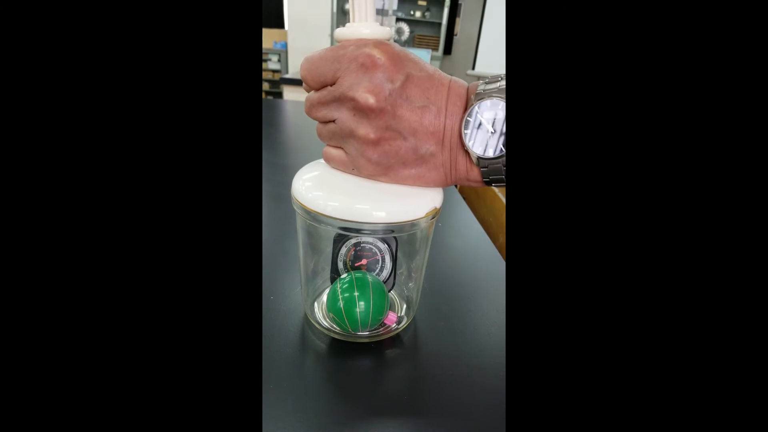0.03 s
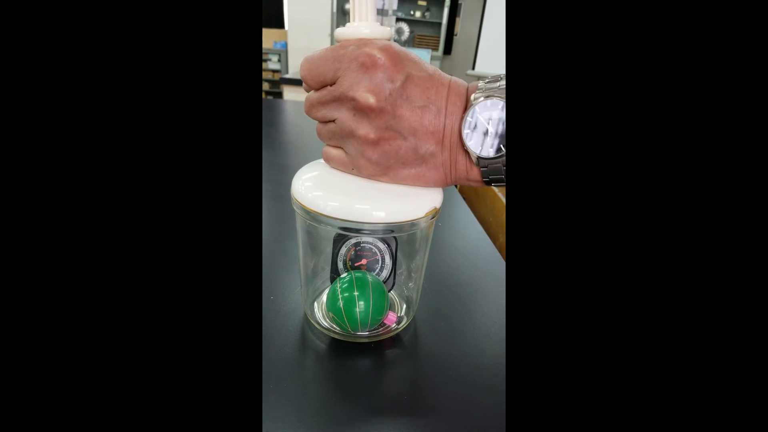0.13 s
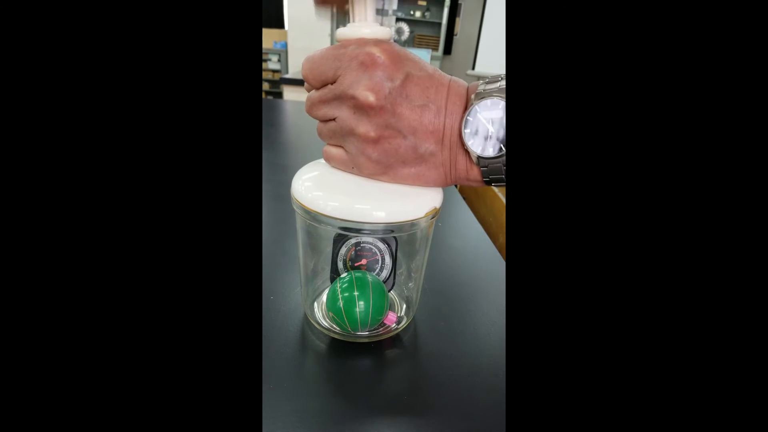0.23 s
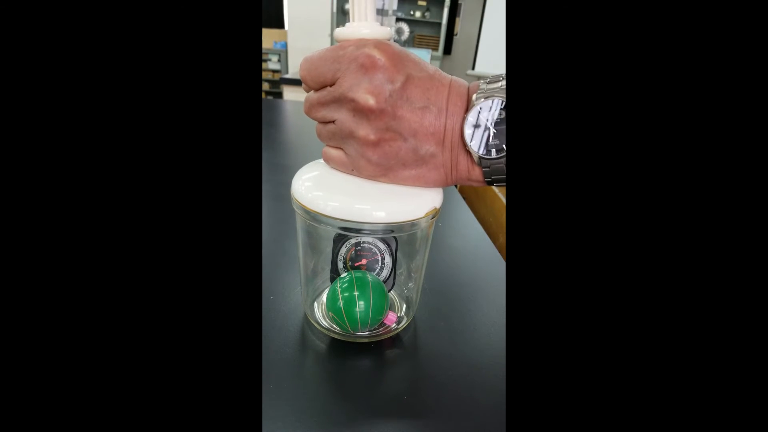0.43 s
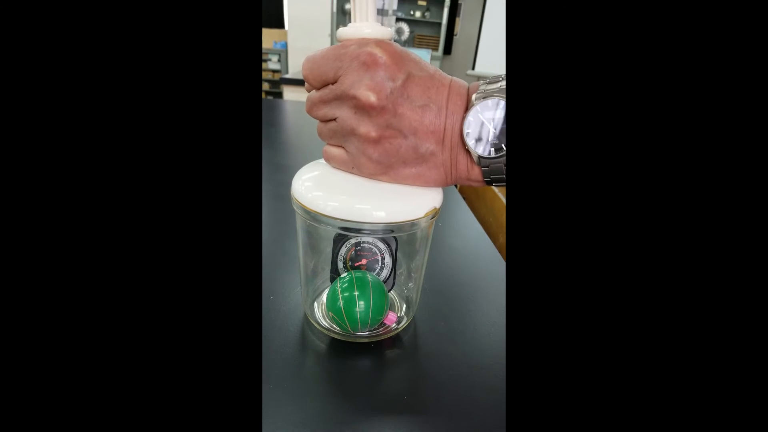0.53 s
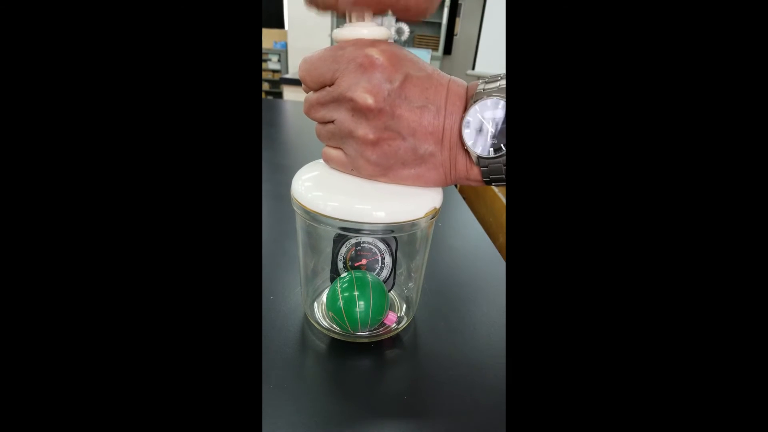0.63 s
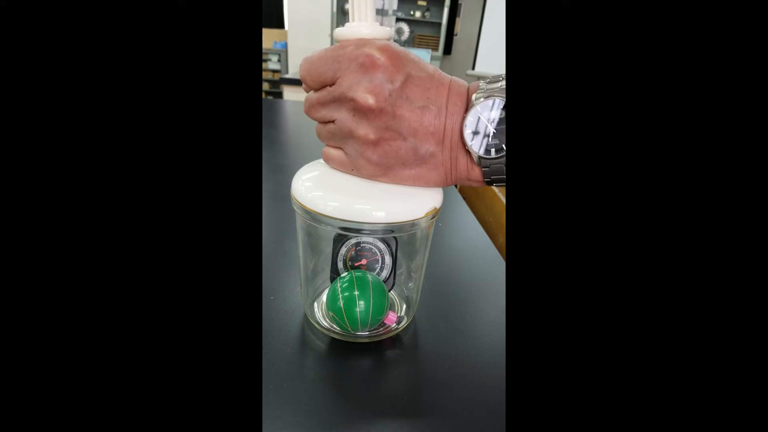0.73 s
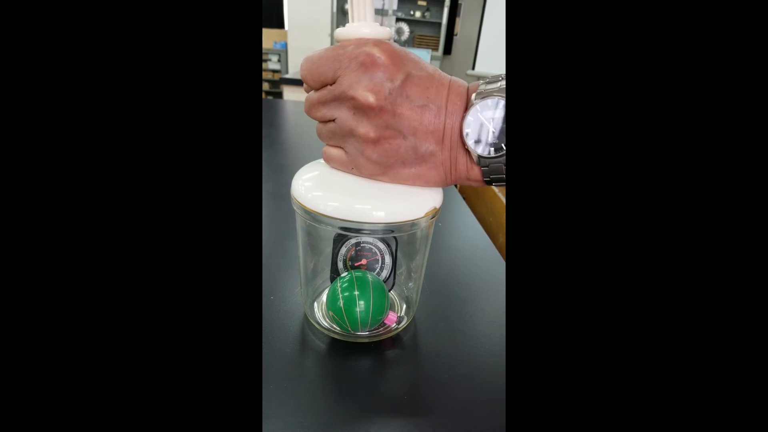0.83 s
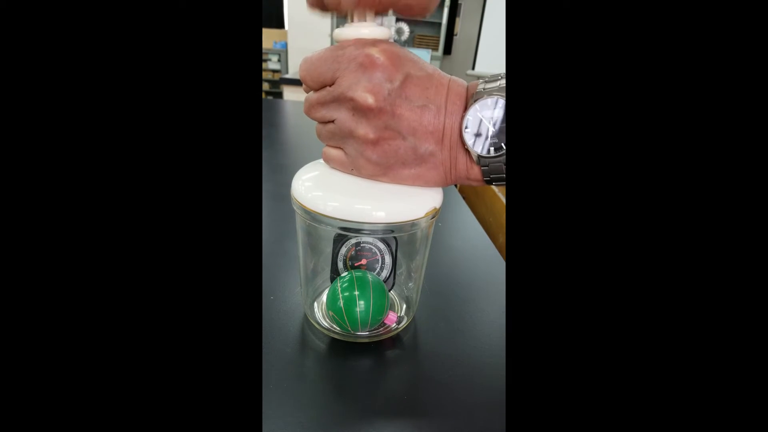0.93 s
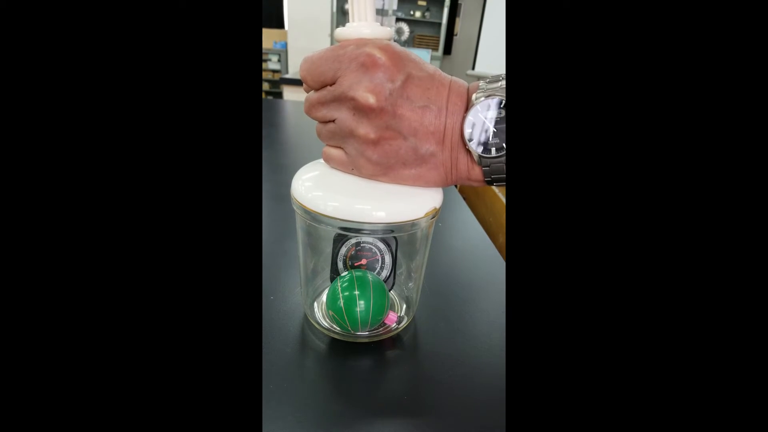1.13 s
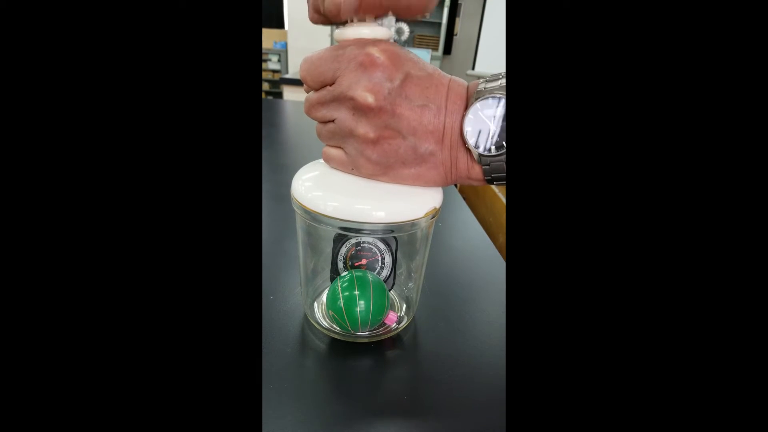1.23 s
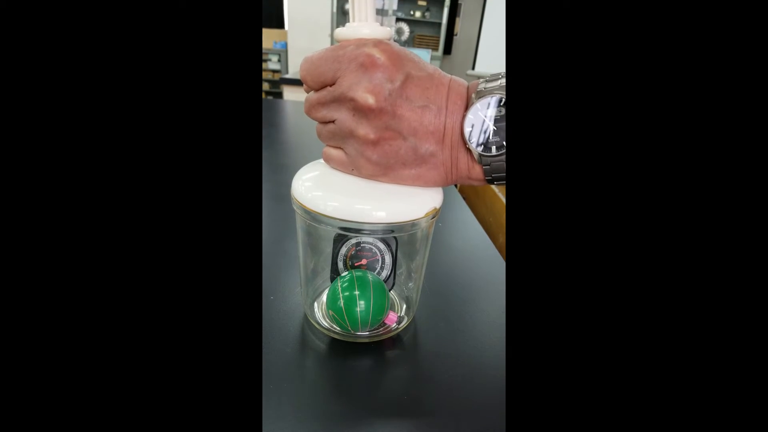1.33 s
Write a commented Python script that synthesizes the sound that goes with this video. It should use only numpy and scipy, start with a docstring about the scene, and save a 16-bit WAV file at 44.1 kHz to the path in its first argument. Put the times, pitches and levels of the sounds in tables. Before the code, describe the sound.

A hand pump on a sealed container makes hollow pops, airy hisses and short squeaks.

```python
"""Hand vacuum pump, close up

A pump on a sealed container is worked in a small quiet room. Air hisses past the piston until the
seal lets go with a hollow pop that rings the barrel. On the way back the valve whistles and the
stroke ends in a softer thump and plastic clicks. The room rings after every pop."""
import sys
import numpy as np
from scipy import signal
from scipy.fft import rfft, irfft, next_fast_len
from scipy.io import wavfile
from scipy.ndimage import map_coordinates

SR = 44100
rng = np.random.default_rng(int(sys.argv[2]) if len(sys.argv) > 2 else 0)


def put_to_file(sound):
    """Save the sound as 16-bit audio at rate SR, in the file named by the first command-line argument."""
    columns = np.atleast_2d(sound).T  # one column per channel
    safe = np.clip(columns, -1, 1)
    whole_steps = np.round(safe * 32767)
    wavfile.write(sys.argv[1], SR, whole_steps.astype(np.int16))


N = 61739

# air flow past the piston: t/s, rise/s, hold/s, fall/s, level/dB
PISTON_FLOWS = [(0.0075, 0.0046, 0.019, 0.046, -38.5), (0.236, 0.00085, 0.0054, 0.11, -43),
                (.29, 0.0309, 0.025, 0.0444, -33), (0.625, 0.02, 0.039, 0.021, -41),
                (0.914, 0.029, 0.032, 0.0227, -37), (1.192, 0.013, 0.0092, .03, -44),
                (1.261, 0.0062, 0.037, 0.056, -44)]
# hiss spectrum: f/Hz, level/dB
HISS_SPECTRUM = [(200, 0.5), (900, -3), (2000, -10.5), (3500, 0.5), (6000, -2.5), (7200, -2.5), (8400, 4),
                 (10000, 5), (12500, 2), (15500, 1)]
# resonances of the piston gap at peak flow: f/Hz, width/Hz, level/dB
GAP_MODES = [(3340, 240, -21), (5950, 260, -12.5), (8430, 410, -25)]
# hiss balance: f/Hz, left minus right/dB
HISS_BALANCE = [(60, -2), (110, -1), (200, 15), (380, 0.5), (700, 12), (1290, 5), (2380, 4), (4400, 3),
                (8120, 2.5), (15000, 5.5)]
# plastic and rubber clicks: t/s, ring f/Hz, ring level/dB, ring t60/s, snap level/dB, snap t60/s
HANDLE_CLICKS = [(0.0093, 1048, -28, 0.029, -31, .012), (0.2406, 4840, -43, 0.0046, -24.5, 0.015),
                 (0.258, 3210, -26, 0.0059, -50, 0.0044), (0.6391, 1000, -34, .025, -39, 0.022),
                 (0.87, 4460, -27.5, 0.0062, -33.5, 0.032), (0.8783, 3195, -23, 0.013, -33.5, .012),
                 (0.9279, 1215, -33, .025, -44, 0.022), (1.213, 3060, -25, 0.0051, -27, 0.011),
                 (1.2155, 3370, -21.5, 0.013, -36.5, 0.025), (1.2185, 4020, -18.5, 0.006, -32, 0.021),
                 (1.2668, 3300, -45.5, 0.0062, -28.5, 0.0042)]
# noise in a click: f/Hz, level/dB
SNAP_SPECTRUM = [(100, 3), (700, 12), (2000, -9.5), (4500, 6.5), (8000, -5), (12000, -1), (16000, -6)]
# dull nudges of the handle: t/s, f/Hz, level/dB, t60/s
HANDLE_NUDGES = [(0.01, 244, -34, 0.07), (.241, 125, -28.5, 0.1), (0.927, 164, -32, 0.06),
                 (1.202, 206, -72, 0.02), (1.207, 513, -23.5, 0.035), (1.2135, 1095, -24, 0.016),
                 (1.269, 148, -31, 0.025)]
# valve notes: t/s, length/s, f/Hz, sag/Hz, level/dB
VALVE_NOTES = [(0.127, 0.077, 4555, 41, -33), (0.771, 0.066, 4580, 71, -35.5), (1.07, 0.073, 3805, 14, -50)]
# seal releases: t/s, level/dB, mode roll-off f/Hz, relative crack level/dB
SEAL_POPS = [(0.2001, -5.5, 1950, -23.5), (0.3539, 3.5, 3100, -20), (0.6782, -1, 5960, -16.5),
             (.9733, -1.5, 6600, -15), (1.1615, -12, 980, -33)]
# air column and wall of the barrel: f/Hz, level/dB, t60/s
BARREL_MODES = [(173.6, -18.5, 0.055), (261, -17, 0.046), (394, -11.5, 0.02), (538.6, -10.5, 0.055),
                (611, -17, 0.069), (752.8, -4, 0.033), (1160, -12.5, 0.015), (1450, -16.5, .018),
                (1871, -7, 0.015), (2210, -13, 0.011), (3318, -6, 0.0084), (4334, -19, 0.021),
                (5224, -14, 0.012), (6710, -8, 0.0078)]
# noise in a pop: f/Hz, level/dB
CRACK_SPECTRUM = [(300, -14), (1500, 6), (2500, 2), (4000, 6), (7500, -7), (9000, -14.5), (12000, -14),
                  (16000, -22.5)]
# reflections off table and hands: delay/s, level/dB
NEAR_ECHOES = [(.0039, -26.5), (.0087, -16)]
# stereo phase of the barrel's ring: f/Hz, left lead/rad
BARREL_PHASE = [(100, -0.4), (300, -0.23), (600, -0.82), (1000, -1.2), (2000, -1.73), (4000, -1.4),
                (7000, 1)]
# early wall reflections: delay/s, level/dB
WALL_ECHOES = [(.0335, -36), (0.0394, -28.5)]
# decay of the room's tail: f/Hz, t60/s
TAIL_DECAY = [(100, 0.52), (300, .48), (800, .4), (2000, 0.49), (4500, 0.54), (8000, 0.41), (15000, 0.28)]
# colour of the room's tail: f/Hz, level/dB
TAIL_SPECTRUM = [(60, -9.5), (200, -1.5), (380, -2), (500, -7.5), (630, -7.5), (760, -12.5), (1100, -9),
                 (1550, -7.5), (1900, -14), (2400, -8), (3200, -13.5), (4000, -11), (5000, -11),
                 (8000, -9.5), (15000, -15.5)]
# diffuse field: f/Hz, left-right correlation
ROOM_COHERENCE = [(100, 0.76), (300, 0.93), (700, 0.17), (1500, 0.033), (5000, 0.024)]
# standing waves of the room: f/Hz, relative level/dB, t60/s
STANDING_WAVES = [(71, -10, 0.67), (105, -17, 0.68), (164, -22, .4), (206.5, -0.5, 0.61), (231.2, 1, 0.48),
                  (256.1, -3, 0.54), (340.6, -12.5, 0.89), (490, -22, 0.21), (541, -16, 0.13),
                  (766, -19.5, 0.3)]
# quiet background: f/Hz, level/dB
FLOOR_SPECTRUM = [(25, -24), (45, -12), (70, 3.5), (110, -2), (200, 6.5), (350, -2.5), (700, -1.5),
                  (1100, -11), (3000, -19), (8000, -27), (16000, -28.5)]

HALF_SPLIT = np.array([[.5], [-.5]])  # shares a difference between left and right


def amp(db):
    """Decibels to gain."""
    return 10 ** (np.asarray(db) / 20)


def unit(x):
    """Scale to rms 1."""
    return x / np.sqrt(np.mean(x ** 2) + 1e-20)


def along(points, hz):
    """Interpolate (f/Hz, value) points on a log axis."""
    f, v = np.transpose(points)
    return np.interp(np.log(hz + 1), np.log(f + 1), v)


def since(start_s):
    """Seconds since the start, zero before it."""
    return np.maximum(np.arange(N) / SR - start_s, 0)


def wobble(rate_hz):
    """Smooth random curve with knots at rate_hz."""
    knots = rng.standard_normal(int(N * rate_hz / SR) + 4)
    return map_coordinates(knots, [np.arange(N) * rate_hz / SR])


def filtered(x, response):
    """Apply a complex frequency response."""
    size = next_fast_len(N + SR // 2)
    return irfft(rfft(x, size) * response(np.fft.rfftfreq(size, 1 / SR)), size)[..., :N]


def noise(spectrum):
    """Coloured noise, rms 1."""
    return unit(filtered(rng.standard_normal(N), lambda hz: amp(along(spectrum, hz))))


def decay(start_s, t60_s, wave=np.ones_like):
    """wave(t) dying 60 dB in t60_s; by default the bare envelope."""
    out = np.zeros(N)
    first = int(np.ceil(start_s * SR))
    t = np.arange(first, min(N, first + int(2 * t60_s * SR))) / SR - start_s
    out[first:first + len(t)] = wave(t) * np.exp(-np.log(1000) * t / t60_s)
    return out


def ring(start_s, hz, t60_s, attack_s=1e-5):
    """Struck mode: a damped sine."""
    return decay(start_s, t60_s, lambda t: np.sin(2 * np.pi * hz * t) * (1 - np.exp(-t / attack_s)))


def place(x, pan_db, lead_ms):
    """Close source: positive values are louder and earlier on the left."""
    pair = filtered(x, lambda hz: np.exp(2j * np.pi * hz * HALF_SPLIT * lead_ms / 1000))
    return amp(pan_db * HALF_SPLIT) * pair


def radiated(x, cutoff_hz=134):
    """The small barrel radiates little bass."""
    return signal.sosfilt(signal.butter(4, cutoff_hz, "highpass", fs=SR, output="sos"), x)


def reflected(x, echoes, dull_hz):
    """Delayed, low-passed copies."""
    n = np.arange(N)
    copies = sum(amp(db) * np.interp(n - delay_s * SR, n, x, left=0) for delay_s, db in echoes)
    pole = np.exp(-2 * np.pi * dull_hz / SR)
    return signal.lfilter([1 - pole], [1, -pole], copies)


def diffuse(pair, spectrum):
    """Two noises coloured and blended into a field coherent in the bass."""
    def mid_side_gains(hz):
        angle = np.arccos(np.clip(along(ROOM_COHERENCE, hz), -1, 1)) / 2
        return amp(along(spectrum, hz)) * [np.cos(angle), np.sin(angle)]
    mid, side = filtered(pair, mid_side_gains)
    return np.array([mid + side, mid - side])


def piston_hiss(range_db=28.5, flutter_db=2.82, gap_glide=0.08, spits_per_s=350, spit_db=-7):
    """Air squeezes past the seal, swelling with the stroke, spitting and half whistling in the gap."""
    flow = np.zeros(N)
    for start_s, rise_s, hold_s, fall_s, db in PISTON_FLOWS:
        t = since(start_s)
        below_peak = 1 - np.minimum(t / rise_s, 1) + since(start_s + rise_s + hold_s) / fall_s
        flow += (t > 0) * amp(db - range_db * below_peak)
    warped_s = np.cumsum(1 + gap_glide * (1 - flow / flow.max())) / SR  # less flow, higher pitch
    gap = np.zeros(N)
    for hz, width_hz, db in GAP_MODES:
        phase = 2 * np.pi * hz * warped_s
        gap += amp(db) * (wobble(width_hz) * np.sin(phase) + wobble(width_hz) * np.cos(phase))
    impulses = rng.standard_normal(N + 1) * (rng.random(N + 1) < spits_per_s / SR)
    spit = amp(spit_db) * unit(np.diff(impulses))
    flow *= amp(flutter_db * wobble(rate_hz=600))
    scattered = amp(1.5) * flow * np.array([noise(HISS_SPECTRUM), noise(HISS_SPECTRUM)])
    direct = place(flow * (noise(HISS_SPECTRUM) + gap + spit), pan_db=4.5, lead_ms=0.1465)
    return filtered(direct + scattered, lambda hz: amp(along(HISS_BALANCE, hz) * HALF_SPLIT))


def handle_clicks():
    """Handle and seal click and nudge the barrel as the stroke reverses."""
    rings, snap_envelope = np.zeros(N), np.zeros(N)
    for start_s, hz, ring_db, ring_t60_s, snap_db, snap_t60_s in HANDLE_CLICKS:
        rings += amp(ring_db) * ring(start_s, hz, ring_t60_s)
        snap_envelope += amp(snap_db) * decay(start_s, snap_t60_s)
    snaps = snap_envelope * noise(SNAP_SPECTRUM)
    nudges = sum(amp(db) * ring(start_s, hz, t60_s, attack_s=1 / hz)
                 for start_s, hz, db, t60_s in HANDLE_NUDGES)
    return place(radiated(rings + snaps), pan_db=12.5, lead_ms=0.053) + nudges


def valve_whistles(rise_s=0.011, fall_s=0.025, jitter_hz=7.5, flutter_db=2):
    """The valve sings a nearly pure note that sags as the flow weakens."""
    notes = np.zeros(N)
    for start_s, length_s, hz, sag_hz, db in VALVE_NOTES:
        t = since(start_s)
        pitch_hz = hz - sag_hz * np.minimum(t / length_s, 1) ** 1.23 + jitter_hz * wobble(rate_hz=151.6)
        tone = np.sqrt(2) * np.sin(2 * np.pi * np.cumsum(pitch_hz) / SR)
        envelope = np.clip(t / rise_s, 0, 1) * np.clip((length_s - t) / fall_s, 0, 1)
        notes += amp(db + flutter_db * wobble(rate_hz=130)) * envelope * tone
    return place(notes, pan_db=10, lead_ms=0.0089)


def seal_pops():
    """A pressure step rings the barrel; a gentler release leaves the high modes out."""
    barrel, crack_envelope = np.zeros(N), np.zeros(N)
    for start_s, db, rolloff_hz, crack_db in SEAL_POPS:
        for k, (hz, mode_db, t60_s) in enumerate(BARREL_MODES):
            gain = amp(db + mode_db) / np.hypot(1, (hz / rolloff_hz) ** 2)
            barrel += (-1) ** k * gain * ring(start_s, hz, t60_s, attack_s=0.0009)  # neighbours oppose
        crack_envelope += amp(db + crack_db) * decay(start_s, t60_s=0.014)
    barrel = radiated(barrel + reflected(barrel, NEAR_ECHOES, dull_hz=1540))
    barrel_pair = filtered(barrel, lambda hz: np.exp(1j * along(BARREL_PHASE, hz) * HALF_SPLIT))
    crack = radiated(crack_envelope * noise(CRACK_SPECTRUM))
    return barrel_pair + place(crack, pan_db=13.5, lead_ms=0.13)


def room(x, tail_build_s=0.0021, modes_build_s=0.022, modes_db=-54):
    """The walls return early echoes, a diffuse tail and low standing waves."""
    hz, t, bands = signal.stft(rng.standard_normal((2, N)), SR, nperseg=256)
    bands *= amp(-60 * t / along(TAIL_DECAY, hz)[:, None])
    tail = signal.istft(bands, SR, nperseg=256)[1][:, :N]
    tail *= 1 - np.exp(-(since(0) / tail_build_s) ** 2)
    tail = diffuse(tail / np.linalg.norm(tail[0]), TAIL_SPECTRUM)
    modes = sum(amp(db + modes_db) * ring(0, mode_hz, t60_s) for mode_hz, db, t60_s in STANDING_WAVES)
    modes *= 1 - np.exp(-since(0) / modes_build_s)
    reverb = signal.fftconvolve(x[None], tail + modes, axes=1)[:, :N]
    return reflected(x, WALL_ECHOES, dull_hz=1270) + reverb


def scene(hiss_click_send_db=-3.5, whistle_send_db=-4.5, floor_db=-45.5):
    """Pump, room response and quiet background, in stereo."""
    pops = seal_pops()
    hiss_and_clicks = piston_hiss() + handle_clicks()
    whistles = valve_whistles()
    send = pops[0] + amp(hiss_click_send_db) * hiss_and_clicks[0] + amp(whistle_send_db) * whistles[0]
    reverb = room(send)
    floor = amp(floor_db) * unit(diffuse(rng.standard_normal((2, N)), FLOOR_SPECTRUM))
    return pops + hiss_and_clicks + whistles + reverb + floor


def record(dry, top_hz=16100):
    """Soft peak limit, then band limit."""
    rounded = dry / (1 + np.abs(dry) ** 6) ** (1 / 6)
    return filtered(rounded, lambda hz: hz < top_hz)


dry = scene()
out = record(dry)
put_to_file(out)
```